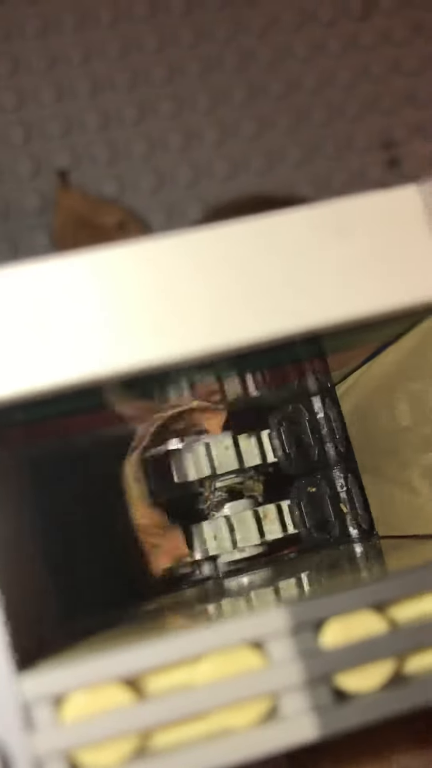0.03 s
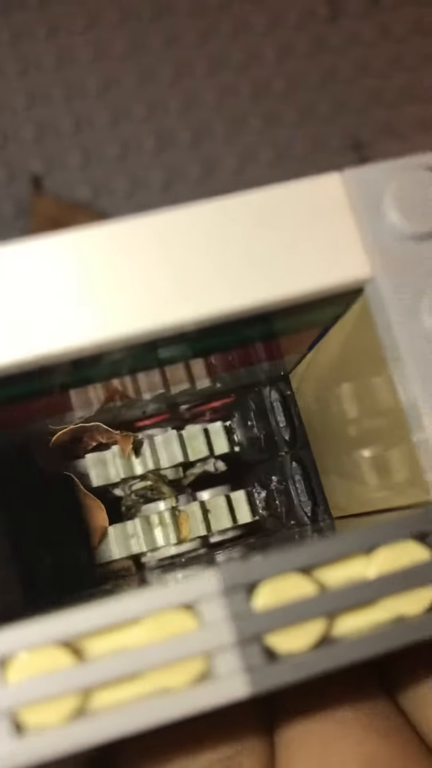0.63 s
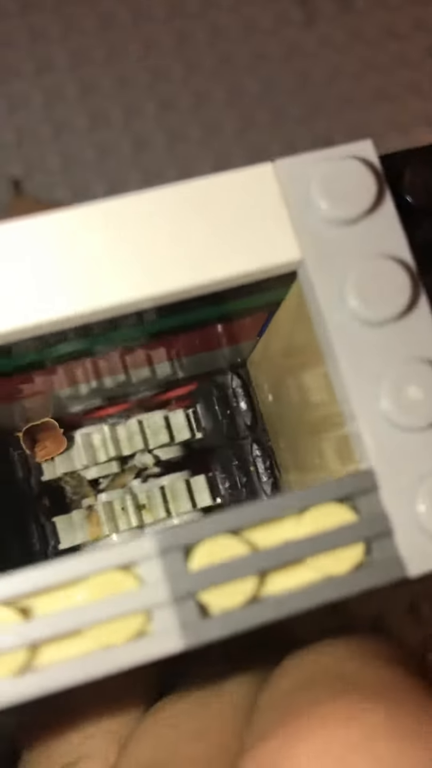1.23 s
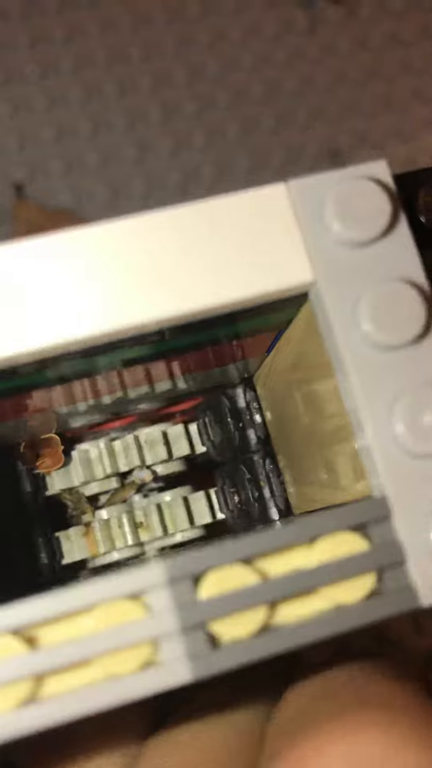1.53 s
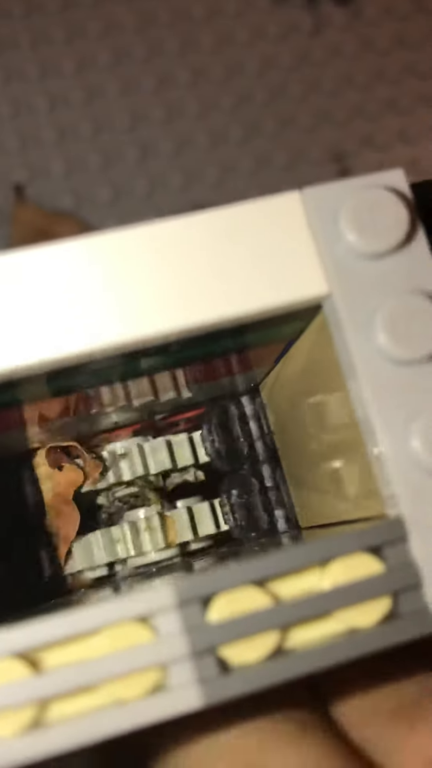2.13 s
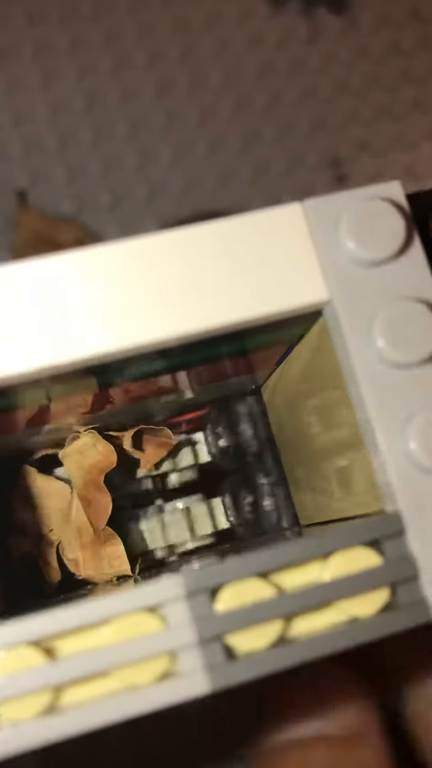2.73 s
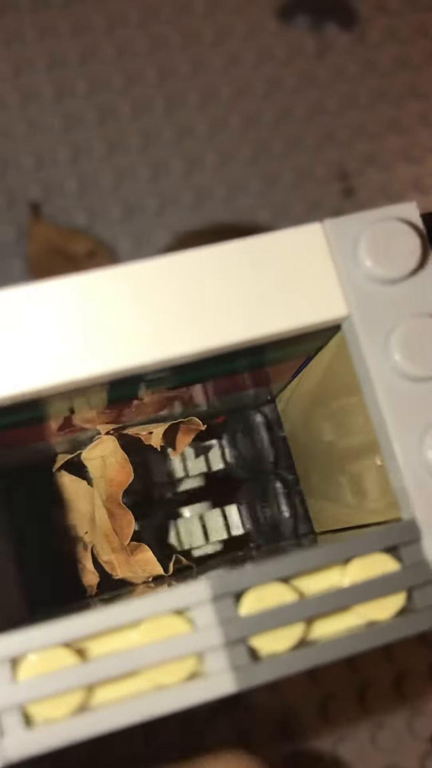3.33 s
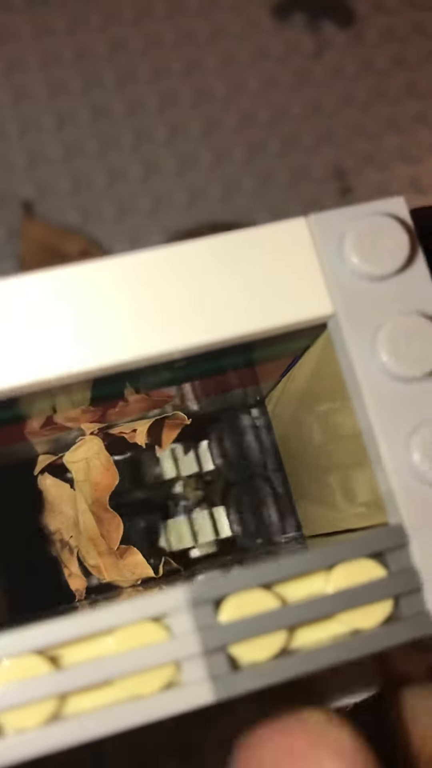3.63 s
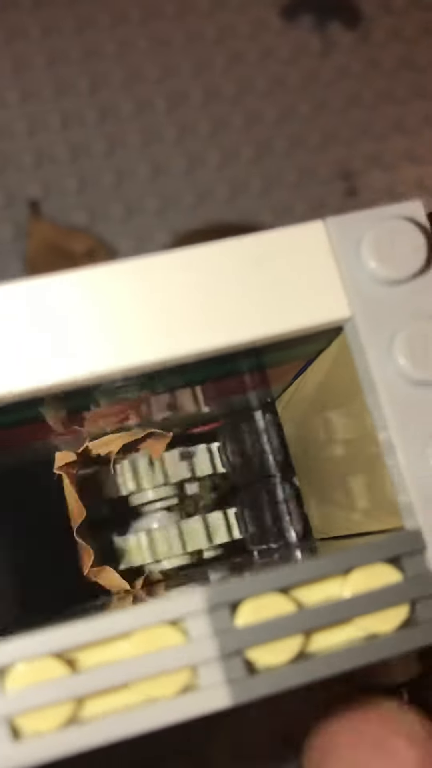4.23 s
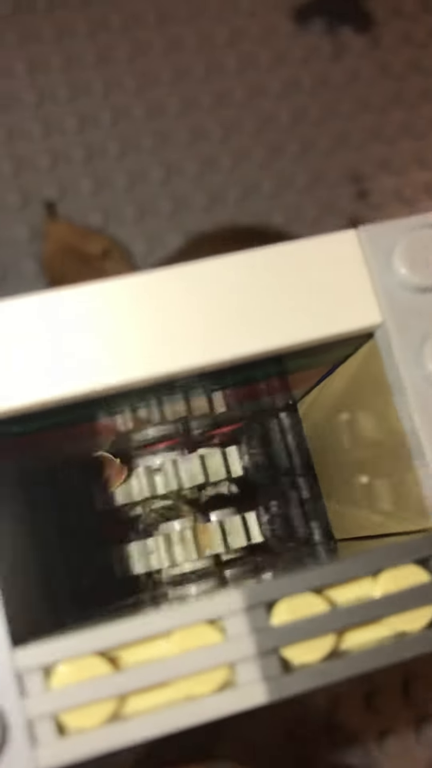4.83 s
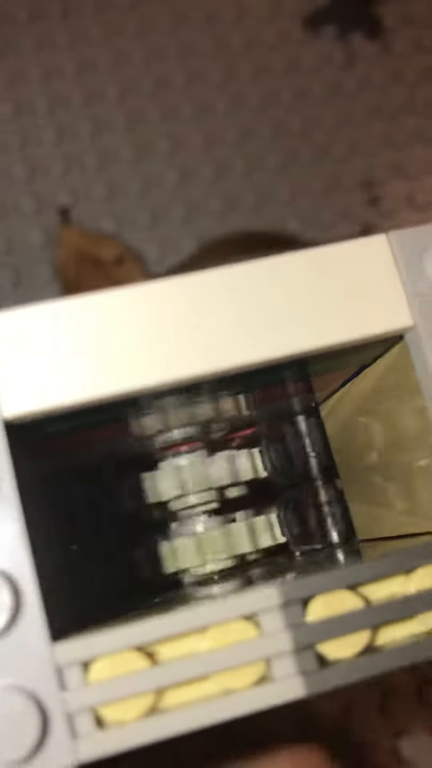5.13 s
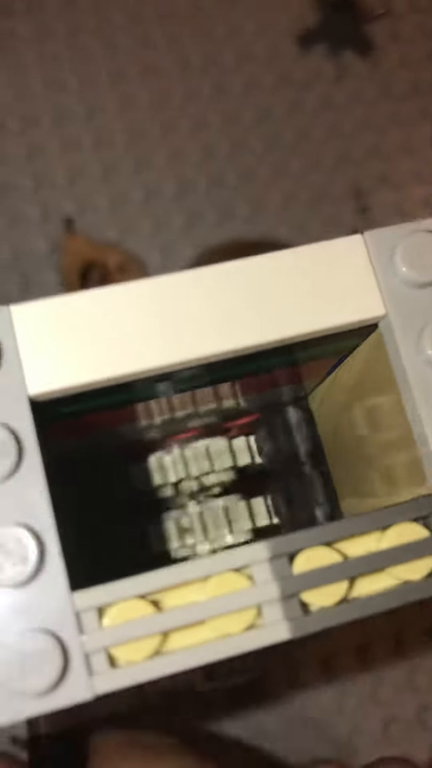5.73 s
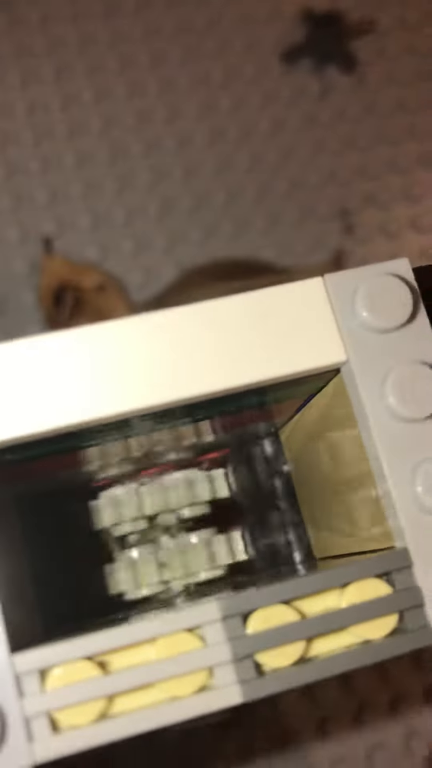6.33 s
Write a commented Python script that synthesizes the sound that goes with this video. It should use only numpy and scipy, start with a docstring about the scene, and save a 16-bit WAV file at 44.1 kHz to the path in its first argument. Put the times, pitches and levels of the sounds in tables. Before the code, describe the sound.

A toy shredder of plastic bricks is cranked by hand, close by in a quiet room. From the start to about 1.5 seconds, a dry leaf snaps in short, sharp clusters, strongest around 0.15 and 1.2 seconds, with a few gear clacks. A soft hiss comes and goes twice over a very faint hum. After a brief lull, from 2 seconds the leaf crumbles in a denser, bright crackle over rattling teeth, with light papery scrapes. Between 3.4 and 4 seconds the teeth flick a stiff leaf edge in quick ticks. The crackling thins around 4.4 seconds, and the last snaps come near 5 seconds. From then until about 6.5 seconds the gears run empty, rattling and clacking unevenly in the hollow box, with faint, rough axle groans. Soft low bumps and rubbing from the fingers on the housing continue throughout.

```python
"""In a quiet room, close by, a toy shredder of plastic bricks is cranked by hand.
Its gears catch a dry leaf, which snaps and crumbles by brittle fracture, then run empty and rattle:
each impact of the teeth excites the modes of the hollow box. The fingers bump and rub the housing,
and friction makes an axle groan. A soft hiss comes and goes at first, over a faint hum."""
import sys
import numpy as np
from scipy import signal
from scipy.fft import rfft, irfft, next_fast_len
from scipy.io import wavfile
from scipy.ndimage import uniform_filter1d, map_coordinates

SR = 44100
rng = np.random.default_rng(int(sys.argv[2]) if len(sys.argv) > 2 else 0)


def master_out(mix):
    """Clip the mix to full scale and print it as 16-bit PCM to the path in sys.argv[1]."""
    frames = np.transpose(np.atleast_2d(mix))
    ceiling = np.clip(frames, -1, 1)
    pcm = np.round(ceiling * 32767).astype(np.int16)
    wavfile.write(sys.argv[1], SR, pcm)


N = 290178


def amp(db):
    """Decibels to amplitude ratio."""
    return 10 ** (np.asarray(db) / 20)


def unit(x):
    """Normalisation to rms 1."""
    return x / np.sqrt(np.mean(x ** 2) + 1e-20)


def along(points, hz):
    """Interpolation of (frequency, value) points on a log axis."""
    f, v = np.transpose(points)
    return np.interp(np.log(hz + 1), np.log(f + 1), v)


def curve(points):
    """Linear interpolation of (time, value) points at every sample."""
    return np.interp(np.arange(N) / SR, *np.transpose(points))


def wobble(rate):
    """Random modulation: a spline through rate Gaussian knots a second."""
    knots = rng.standard_normal(int(N * rate / SR) + 4)
    grid = np.arange(0, len(knots) - 1, 1 / 8)
    return np.interp(np.arange(N) * rate / SR, grid, map_coordinates(knots, [grid]))


def filtered(x, response):
    """Zero-phase filtering: the spectrum times a frequency response."""
    m = next_fast_len(N + SR // 2)
    return irfft(rfft(x, m) * response(np.fft.rfftfreq(m, 1 / SR)), m)[:N]


def noise(spectrum):
    """Spectral shaping of white noise, to rms 1."""
    return unit(filtered(rng.standard_normal(N), lambda hz: amp(along(spectrum, hz))))


def impulse(gain, size=2048):
    """Minimum-phase impulse response, of energy 1, of a body with this gain over frequency."""
    cepstrum = irfft(np.log(gain(np.fft.rfftfreq(size, 1 / SR)) + 1e-6))
    cepstrum[1:size // 2] *= 2
    cepstrum[size // 2 + 1:] = 0
    ring = irfft(np.exp(rfft(cepstrum)))
    return ring / np.linalg.norm(ring)


def peak(hz, centre_hz, width_hz):
    """Lorentzian power response of one resonance."""
    return 1 / (1 + (2 * (hz - centre_hz) / width_hz) ** 2)


def blow(ring, t60, tail_db, tail_t60, click):
    """Impact: a click, a noise burst and a faint tail excite a body; rms 1 over the first 5 ms."""
    t = np.arange(SR // 20) / SR
    force = rng.standard_normal(len(t)) * (amp(-60 * t / t60) + amp(tail_db - 60 * t / tail_t60))
    force[0] += click
    sound = signal.fftconvolve(force, ring)
    return sound / np.sqrt(np.mean(sound[:SR // 190] ** 2))


def add(track, s, sound):
    """Superposition of a sound at time s."""
    part = track[max(round(s * SR), 0):][:len(sound)]
    part += sound[:len(part)]


def contacts(rate, spread_db):
    """Shot noise: rate random impulses a second, many faint and few strong."""
    when, size, sign = rng.random((int(rate * N / SR), 3)).T
    level_db = np.minimum(-np.log(1 - size), 4) * spread_db
    return np.bincount((when * N).astype(int), np.sign(sign - .5) * amp(level_db), N)


def steadied(x, size):
    """Division by the running rms over size samples: the fine grain stays, the slow level is 1."""
    power = uniform_filter1d(uniform_filter1d(x ** 2, size), size // 2)
    return x / np.sqrt(np.abs(power) + 1e-12)


def rubs(rows, quality, rough_db):
    """Friction noise swells and fades in one resonance, roughened by fast modulation."""
    t, out = np.arange(N) / SR, np.zeros(N)
    for s, length, pitch_hz, db in rows:
        b, a = signal.iirpeak(pitch_hz, quality, SR)
        rub = unit(signal.lfilter(b, a, signal.lfilter(b, a, rng.standard_normal(N))))
        out += amp(db) * np.exp(-(2 * (t - s) / length) ** 2) * rub
    return out * unit(amp(rough_db * wobble(220)))


def background():
    """Ambient noise: room air, a hum that wavers in phase, and a gated soft hiss."""
    # spectra of air and hiss (frequency [Hz], relative level [dB])
    air_spectrum = [(20, -25), (45, -7), (75, -0.5), (130, -0.5), (260, -6.5), (430, -6.5), (560, -13),
                    (1000, -15.5), (1500, -17), (3000, -25), (5000, -24.5), (11000, -32), (15700, -28)]
    hiss_spectrum = [(200, 0), (450, 0), (800, -4.5), (1900, -2), (2400, -3.5), (3300, -3), (5000, -5.5),
                     (8500, -7), (10400, -10), (12000, -7.5), (15700, -12.5)]
    # partials of the hum (frequency [Hz], level [dB])
    partials = [(205, -70), (306, -76.5)]
    # spells of hiss (start [s], end [s], level [dB])
    spells = [(0, .755, -61), (1.17, 1.61, -63)]
    t = np.arange(N) / SR
    hum = sum(amp(db) * np.sqrt(2) * np.sin(2 * np.pi * hz * t + 0.71 * wobble(4.4))
              for hz, db in partials)
    gate = sum(amp(db) * np.clip(np.minimum(t - start, end - t) / 0.00097, 0, 1)
               for start, end, db in spells)
    return amp(-64) * noise(air_spectrum) + hum + gate * noise(hiss_spectrum)


def room_echo(x):
    """Reverberation of a small soft room: absorption takes the treble first."""
    # decay of the room (frequency [Hz], reverberation time [s])
    decay = [(200, 0.52), (2000, 0.074), (12000, 0.045)]
    hz, t, spectra = signal.stft(rng.standard_normal(SR // 3), SR, nperseg=256)
    tail = signal.istft(spectra * amp(-60 * t / along(decay, hz)[:, None]), SR, nperseg=256)[1]
    delayed = np.pad(x, (SR // 200, 0))
    return signal.fftconvolve(delayed, tail / np.linalg.norm(tail))[:N]


def handling(force_db, firm_db=-48, smoothing_s=0.037):
    """Structure-borne sound: fingers rumble on the housing; they and the crank excite its cavity."""
    # rumble of the grip (time [s], level [dB])
    grip = [(0, -66), (.2, -56), (.5, -67.5), (.66, -60), (.8, -78), (1.08, -66), (1.18, -56), (1.48, -74),
            (1.65, -58.5), (1.85, -68), (2.12, -58.5), (2.35, -63), (2.8, -67.5), (4.78, -73),
            (5.07, -57.5), (5.35, -72), (6.15, -62.5), (6.58, -63)]
    # spectra of hand and cavity (frequency [Hz], relative level [dB])
    hand_spectrum = [(15, -47), (30, -5), (45, -6), (75, 3.5), (110, -7.5), (160, -10), (400, -54)]
    cavity_spectrum = [(60, -39.5), (110, -11.5), (150, 4), (190, -8.5), (245, -1.5), (290, 0), (350, 0.5),
                       (400, -5.5), (460, -12.5), (620, -14), (900, -21), (1500, -62.5)]
    hand_db = curve(grip)
    driven_db = -55.5 + 0.69 * (force_db - firm_db)  # firm_db is the force of a firm push
    driven = uniform_filter1d(amp(driven_db), int(smoothing_s * SR))
    knock_gain = np.hypot(driven, amp(hand_db - 5.5))
    cavity = impulse(lambda hz: amp(along(cavity_spectrum, hz)), size=8192)
    knocks = signal.oaconvolve(contacts(rate=300, spread_db=2), cavity)[:N]
    rumble = amp(hand_db) * steadied(noise(hand_spectrum), size=4000)
    return rumble + knock_gain * steadied(knocks, size=2500)


def housing_thumps(rise_s=0.0049):
    """Damped oscillation: the crank jerks and the toy rocks for a few cycles in the hand."""
    # thumps (time [s], peak level [dB], frequency [Hz])
    thumps = [(0.174, -49, 202), (0.218, -50, 119), (.371, -44, 140), (.653, -45, 119), (1.065, -49, 248),
              (1.157, -43.5, 146), (1.293, -52.5, 184), (1.604, -46.5, 154), (1.938, -48.5, 124),
              (2.08, -45, 144), (2.149, -40.5, 138), (2.202, -47, 146), (2.317, -42, 147),
              (2.496, -45.5, 155), (2.612, -47, 138), (2.68, -48, 148), (3.338, -44.5, 260),
              (4.673, -45, 292), (4.917, -44.5, 165), (5.047, -47, 110), (5.196, -45.5, 163),
              (5.598, -46.5, 166), (5.744, -39.5, 193), (6.166, -44, 197), (6.367, -45.5, 168),
              (6.472, -45, 245)]
    t, out = np.arange(SR // 8) / SR, np.zeros(N)
    envelope = t / rise_s * np.exp(1 - t / rise_s)
    for s, db, pitch_hz in thumps:
        add(out, s, amp(db) * envelope * np.sin(2 * np.pi * pitch_hz * t))
    return out


def axle_groans():
    """Dry friction: a plastic axle drags in its hole with brief rough groans."""
    # groans (centre time [s], duration [s], frequency [Hz], level [dB])
    groans = [(2.15, 0.11, 646, -57), (3.19, .087, 726, -56), (5.62, 0.23, 155, -55),
              (5.78, 0.061, 706, -57), (5.84, 0.2, 167, -56), (6.2, 0.12, 144, -56), (6.52, 0.15, 144, -53)]
    return rubs(groans, quality=1.8, rough_db=2.5)


def crank(attack_s=0.012, release_s=0.0091, sag_db=1):
    """Power summation of gentle turning and pushes gives crank force and leaf crushing, in dB."""
    # gentle turning, with stalls (time [s], force level [dB])
    turning = [(0, -85.5), (1.86, -75.5), (2.02, -63), (2.42, -54.5), (2.87, -57.5), (3.17, -58),
               (3.27, -64), (3.39, -55), (3.9, -57), (4.01, -65), (4.075, -73), (4.14, -56), (4.33, -53.5),
               (4.46, -69), (4.77, -66), (5.17, -60), (5.39, -56.5), (5.62, -53), (6.58, -56)]
    # leaf between the gently turning gears (time [s], crackle relative to rattle [dB])
    leaf_load = [(0, -2), (1.85, -7.5), (2.0, -7), (2.25, -4), (2.5, -2.5), (2.95, -5.5), (3.45, -4),
                 (4.05, -9), (4.35, -11), (4.6, 4), (4.8, 4.5), (5.05, -6), (5.3, -14), (5.6, -19),
                 (6.58, -22)]
    # finger pushes (start [s], duration [s], force level [dB], crackle relative to rattle [dB])
    pushes = [(0.177, 0.0066, -46, -14), (0.357, .012, -56, -1), (0.364, 0.0066, -46, -2),
              (1.026, 0.011, -56.5, -1), (1.155, .022, -54.5, -4), (1.92, 0.01, -59, -12),
              (2.03, 0.015, -54, 4.5), (2.104, 0.074, -52.5, -3), (2.243, 0.03, -44, 1),
              (2.278, 0.039, -47.5, 0), (2.342, 0.014, -58, 7), (2.481, 0.085, -53, 0),
              (2.708, 0.019, -46, -7), (2.754, .07, -49.5, -2.5), (2.906, 0.017, -49.5, -8),
              (3.026, 0.061, -51, 0.5), (3.141, .025, -42.5, -0.5), (3.336, 0.028, -45.5, -19),
              (3.457, 0.58, -54.5, -3), (3.821, 0.035, -52, -4), (3.968, 0.033, -49, -5),
              (4.175, .055, -48, -3.5), (4.274, 0.026, -53.5, 3.5), (4.574, .012, -61, 4),
              (4.66, 0.079, -67, -5), (4.821, 0.038, -53.5, -2), (4.887, .01, -46.5, -5),
              (4.912, 0.011, -46, -5), (4.959, 0.014, -47.5, -3), (5.028, 0.0077, -53, 0.5),
              (5.068, .008, -52, -6), (5.112, 0.081, -51.5, -5), (5.199, .006, -42, -18),
              (5.22, 0.016, -40.5, -10), (5.259, 0.086, -46.5, -13.5), (5.48, 0.039, -46, -19),
              (5.594, 0.03, -46, -22), (5.721, 0.039, -39, -20), (5.851, 0.028, -40.5, -13.5),
              (6.154, .10, -39.5, -23), (6.355, 0.066, -40.5, -23), (6.465, 0.095, -45, -29)]
    t = np.arange(N) / SR
    force = amp(curve(turning))
    crush = force * amp(curve(leaf_load))
    for start, length, db, leaf_db in pushes:
        before = np.maximum(start - t, 0) / attack_s
        after = np.maximum(t - start - length, 0) / release_s
        progress = np.clip((t - start) / length, 0, 1)
        push = amp(db - sag_db * progress) * np.exp(-np.minimum(before + after, 20))
        force = np.hypot(force, push)
        crush = np.hypot(crush, push * amp(leaf_db))
    return 20 * np.log10(force), 20 * np.log10(crush)


def box_ring(dull_hz, thin_hz=300, spot_hz=3100, spot_db=-20, modes_db=5, vary_db=5):
    """Modal response of the box struck at one spot, above the broad knock of a tooth."""
    # modes of the box (frequency [Hz], bandwidth [Hz], relative level [dB])
    modes = [(1292, 103, -1.5), (1640, 180, -5.5), (2228, 200, -.5), (2640, 370, -4), (3140, 235, 3),
             (4090, 340, -6), (5820, 270, -6.5), (6480, 180, -5.5)]
    # knock of a tooth (frequency [Hz], relative level [dB])
    tooth_spectrum = [(250, -20.5), (500, -10.5), (900, -7.5), (1400, -1.5), (1900, -11), (3000, -4.5),
                      (3600, -15), (4400, -1.5), (5000, -9), (6900, -5.5), (7800, -15), (10500, -22),
                      (13500, -18), (15800, -25)]
    lifts_db = rng.normal(modes_db, vary_db, len(modes))

    def gain(hz):
        knock = amp(along(tooth_spectrum, hz)) ** 2
        ringing = sum(amp(db + lift) ** 2 * peak(hz, f, width)
                      for (f, width, db), lift in zip(modes, lifts_db))
        spot = amp(spot_db) ** 2 * peak(hz, spot_hz, width_hz=330)
        # a soft contact loses the treble, a light one the bass
        contact = hz ** 4 / (hz ** 4 + thin_hz ** 4) / (1 + (hz / dull_hz) ** 8)
        return np.sqrt((knock + ringing + spot) * contact)
    return impulse(gain, size=1024)


def bright_ring(pitch_hz, width_hz, lift_db):
    """Impulse response of a small stiff part: a bright crack with one broad resonance."""
    # spectrum of the crack (frequency [Hz], relative level [dB])
    spectrum = [(1500, -39), (3500, -10), (4900, -5), (6000, 0), (9400, -2), (10800, -2.5), (14200, -1.5),
                (15800, -11)]
    resonance = lambda hz: np.sqrt(1 + amp(lift_db) ** 2 * peak(hz, pitch_hz, width_hz))
    return impulse(lambda hz: amp(along(spectrum, hz)) * resonance(hz), size=512)


def gear_rattle(force_db, spots=4):
    """Impacts and sliding friction: teeth chatter in clumps at several spots of the box, and scrape."""
    chatter = np.zeros(N)
    for _ in range(spots):
        share = amp(2.7 * wobble(12))
        hits = contacts(rate=280, spread_db=4.5)
        ring = box_ring(dull_hz=17000, vary_db=2.5)
        tick = blow(ring, t60=0.0054, tail_db=-24, tail_t60=0.03, click=12.6)
        chatter += share * signal.oaconvolve(hits, tick)[:N]
    scrape = signal.oaconvolve(rng.standard_normal(N), box_ring(dull_hz=15600, vary_db=3.7))[:N]
    clumps = amp(3.1 * wobble(120))
    return amp(force_db) * steadied(clumps * (unit(chatter) + amp(-2) * unit(scrape)), size=1300)


def gear_clacks():
    """Backlash: a loose gear falls against its neighbour and chatters to rest."""
    # clacks (time [s], box level [dB], tick level [dB], frequency of the struck spot [Hz])
    clacks = [(1.0623, -35, -44, 4000), (1.1596, -44, -50, 1500), (1.2923, -42.5, -57, 2020),
              (1.6505, -54, -56, 1220), (2.3076, -37, -46, 1440), (3.3156, -44, -57, 3100),
              (4.101, -54, -75, 1410), (4.889, -45.5, -43.5, 1470), (5.1963, -38, -43, 2500),
              (5.2397, -38, -47, 3000), (5.302, -43, -54, 3100), (5.414, -49, -45.5, 3100),
              (5.4535, -53, -41.5, 4200), (5.714, -44, -52, 3100), (5.754, -37, -37, 3100),
              (5.967, -42, -54, 3050), (6.038, -38.5, -55, 3120), (6.157, -41, -44.5, 3100),
              (6.1794, -39, -46, 2500), (6.2142, -37.5, -53, 2600), (6.3374, -35.5, -47, 2600),
              (6.3679, -39, -37.5, 1400), (6.429, -39, -40.5, 3100)]
    out = np.zeros(N)
    tooth = bright_ring(5700, width_hz=4200, lift_db=18)
    for s, box_db, tick_db, spot_hz in clacks:
        ring = box_ring(dull_hz=7000, spot_hz=spot_hz, spot_db=13.5, vary_db=4.5)
        add(out, s, amp(box_db) * blow(ring, t60=0.015, tail_db=-26, tail_t60=0.045, click=1.2))
        add(out, s, amp(tick_db) * blow(tooth, t60=0.011, tail_db=-21, tail_t60=0.044, click=1.7))
    return out


def leaf_slides():
    """Sliding friction: the dry leaf whispers along the hopper wall as it is pulled in."""
    # slides (centre time [s], duration [s], frequency [Hz], level [dB])
    slides = [(2.43, 0.15, 7200, -55.5), (2.62, 0.23, 6800, -59), (2.78, 0.18, 6400, -49),
              (2.91, 0.11, 5800, -59), (3.14, 0.088, 6150, -53)]
    return rubs(slides, quality=2.4, rough_db=6.5)


def leaf_crackle(crush_db, flakes=5):
    """Acoustic emission: the leaf crumbles in tiny cracks; flakes of different pitch take turns."""
    # spectrum of the crumbling leaf (frequency [Hz], relative level [dB])
    spectrum = [(800, -28), (2500, -31), (5000, -8), (6300, -6.5), (7300, 1), (9400, 3), (10700, -7.5),
                (11800, 0.5), (13000, -6), (14000, 1.5), (15800, -8.5)]
    cracks = np.zeros(N)
    for flake_hz in np.linspace(6200, 14200, flakes):
        resonance = lambda hz: np.sqrt(1 + 5 * peak(hz, flake_hz, width_hz=2100))
        flake = impulse(lambda hz: amp(along(spectrum, hz)) * resonance(hz))
        crack = blow(flake, t60=0.011, tail_db=-25, tail_t60=0.02, click=5.7)
        share = amp(4.5 * wobble(18))
        cracks += share * signal.oaconvolve(contacts(rate=110, spread_db=8), crack)[:N]
    return amp(crush_db) * steadied(unit(cracks) + amp(-12.5) * noise(spectrum), size=1100)


def snap(db, pitch_hz, box_db, t60):
    """Stress release: the leaf cracks and the freed gears jolt the box, each time at another spot."""
    flake = bright_ring(pitch_hz, width_hz=970, lift_db=10)
    crack = blow(flake, t60=t60, tail_db=-27, tail_t60=0.022, click=2.6)
    spot_hz = 3160 * np.exp(0.087 * rng.standard_normal())
    ring = box_ring(dull_hz=5450, thin_hz=1100, spot_hz=spot_hz, spot_db=7, modes_db=1.5, vary_db=2)
    sound = amp(box_db) * blow(ring, t60=0.021, tail_db=-22, tail_t60=0.045, click=6)
    add(sound, 0, amp(db) * crack)
    return sound


def leaf_snaps():
    """Brittle fracture of veins and stalk; for a while the passing teeth pluck one stiff leaf edge."""
    # fractures (time [s], level [dB], frequency of the fragment [Hz], box level [dB])
    fractures = [(0.085, -50.5, 15400, -69), (.1061, -51.5, 7200, -72), (.1308, -29, 9000, -38.5),
                 (.1425, -43, 5600, -45.5), (0.1462, -33, 8750, -51), (0.1717, -26.5, 9700, -38),
                 (.257, -54.5, 8900, -54.5), (0.3182, -46.5, 9400, -69), (.35, -39.5, 9800, -51),
                 (.369, -36.5, 7340, -41.5), (0.5094, -39, 14400, -42.5), (.524, -48, 14000, -62),
                 (.5422, -50.5, 6500, -53), (0.5959, -51, 11700, -58.5), (0.6851, -43.5, 5540, -49),
                 (.8371, -62, 5200, -62), (.8508, -54.5, 5900, -58), (.9279, -50.5, 14800, -57),
                 (0.9933, -33.5, 5770, -49.5), (1.031, -53, 8500, -60), (1.0621, -38.5, 12800, -47),
                 (1.128, -51, 8100, -64), (1.1515, -37, 14600, -51), (1.1592, -28.5, 5740, -38),
                 (1.1647, -41, 11100, -48), (1.1694, -40, 14300, -46), (1.1745, -43, 9000, -53),
                 (1.2055, -35.5, 5950, -49), (1.2927, -47.5, 6600, -45), (1.4427, -46, 11900, -51.5),
                 (1.4462, -44, 6160, -52.5), (1.655, -53, 5600, -55), (1.816, -60.5, 6150, -65),
                 (1.9343, -56, 6200, -61), (1.962, -59, 5700, -54), (1.9909, -42.5, 14600, -53.5),
                 (2.0392, -45, 5970, -43.5), (2.0425, -43, 9200, -42), (2.0791, -35, 5870, -46.5),
                 (2.1019, -39, 5560, -43.5), (2.106, -35, 13600, -40), (2.119, -46, 9600, -47),
                 (2.1284, -43, 6100, -49), (2.2184, -42, 7300, -53), (2.2392, -37.5, 14500, -50),
                 (2.2592, -38, 11600, -42.5), (2.29, -41, 7100, -50), (2.3073, -39, 6060, -49),
                 (2.358, -42, 13500, -39.5), (2.3908, -44, 7240, -58), (2.3967, -37, 11900, -48),
                 (2.469, -44, 7100, -53), (2.491, -38, 13600, -46), (2.5229, -35.5, 13200, -52),
                 (2.557, -41.5, 11800, -43.5), (2.6346, -45, 7000, -47), (2.8212, -46, 14200, -67),
                 (3.054, -37.5, 9400, -54), (3.098, -40, 9350, -50), (3.1315, -45, 8300, -54),
                 (3.149, -39.5, 7960, -40.5), (3.1703, -39, 13600, -52), (3.3333, -38, 7950, -49),
                 (3.3414, -37.5, 5400, -39), (3.7807, -45, 9500, -48), (4.2041, -41, 6400, -51),
                 (4.2393, -49, 8600, -63), (4.4298, -61, 8650, -74), (4.4459, -52.5, 10600, -77),
                 (4.4563, -66, 13200, -76), (4.52, -53.5, 6100, -53.5), (4.5669, -44, 13500, -64),
                 (4.576, -47.5, 8600, -48.5), (4.648, -40.5, 6100, -43), (4.6518, -42, 7040, -42),
                 (4.6638, -44, 14200, -70), (4.675, -50.5, 9000, -44), (4.718, -50.5, 9450, -56),
                 (4.7547, -53, 14000, -65), (4.7767, -47, 7540, -52), (4.9459, -30.5, 15500, -39),
                 (5.043, -44, 6000, -48.5), (5.0662, -44, 5960, -47), (5.0705, -46, 6600, -47),
                 (5.1054, -33, 10800, -45.5)]
    # flicks of the edge from tooth to tooth (time [s], level [dB])
    flicks = [(3.3931, -37.5), (3.45, -43), (3.4557, -43), (3.4827, -41), (3.5057, -45), (3.541, -42),
              (3.5731, -40), (3.6064, -39), (3.648, -42), (3.6904, -41.5), (3.7276, -41), (3.769, -41.5),
              (3.808, -41), (3.8364, -39.5), (3.863, -38.5), (3.9194, -41), (3.9753, -40.5), (4.0105, -39)]
    out = np.zeros(N)
    for s, db, pitch_hz, box_db in fractures:
        add(out, s, snap(db, pitch_hz, box_db, t60=0.0079))
    for s, db in flicks:
        add(out, s, snap(db, pitch_hz=9270, box_db=db - 11.5, t60=0.0066))
    return out


def scene():
    """Superposition of the shredder's direct sound, its weak reverberation and the background."""
    force_db, crush_db = crank()
    leaf = leaf_snaps() + leaf_crackle(crush_db) + leaf_slides()
    gears = gear_clacks() + gear_rattle(force_db) + axle_groans()
    shredder = leaf + gears + handling(force_db) + housing_thumps()
    return (shredder + amp(-22) * room_echo(shredder) + background())[None]


def record(dry):
    """Band limiting: a low-pass at 16 kHz with an edge 600 Hz wide."""
    return filtered(dry[0], lambda hz: np.clip((16000 - hz) / 600 + .5, 0, 1))[None]


dry = scene()
out = record(dry)
master_out(out)
```